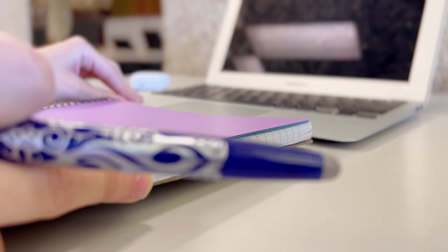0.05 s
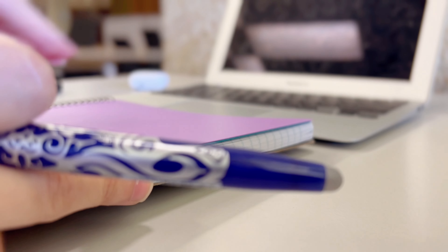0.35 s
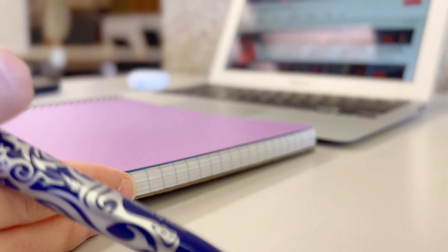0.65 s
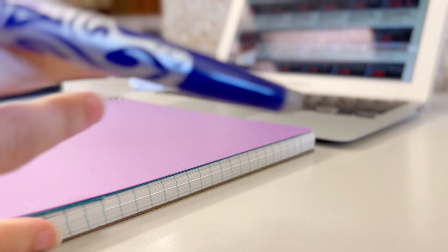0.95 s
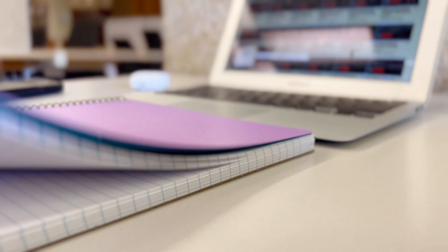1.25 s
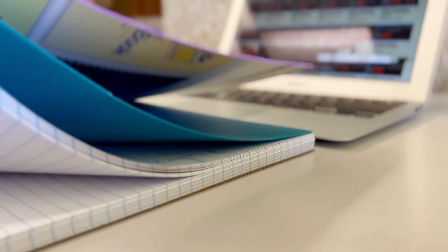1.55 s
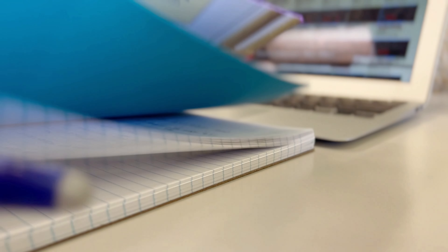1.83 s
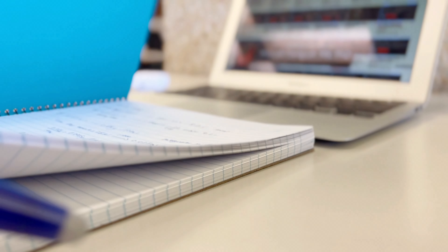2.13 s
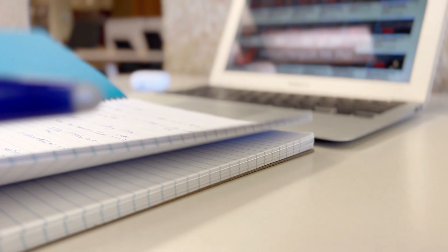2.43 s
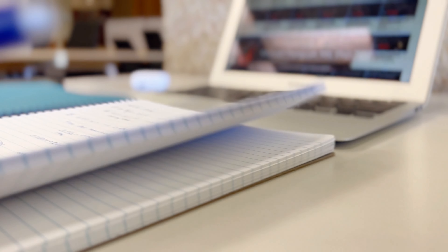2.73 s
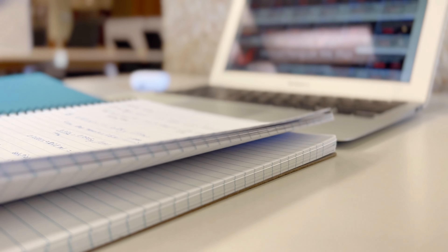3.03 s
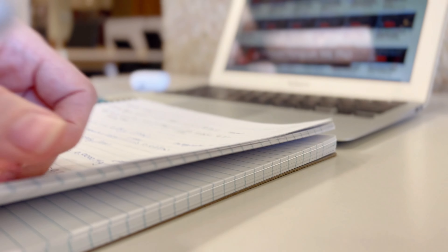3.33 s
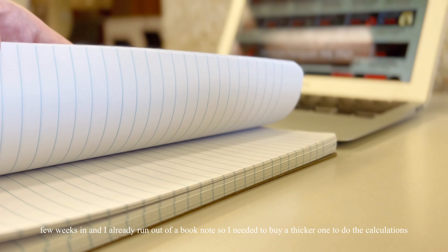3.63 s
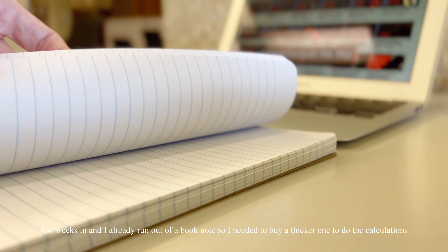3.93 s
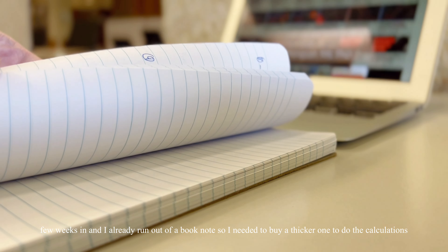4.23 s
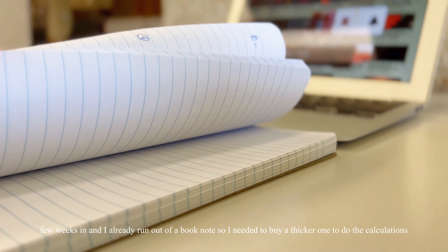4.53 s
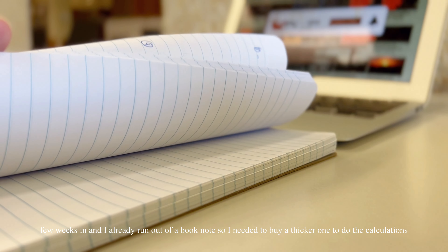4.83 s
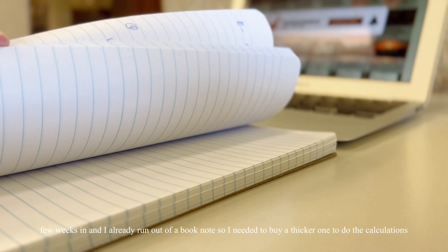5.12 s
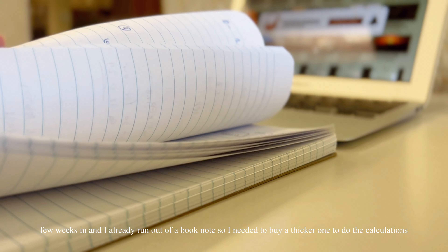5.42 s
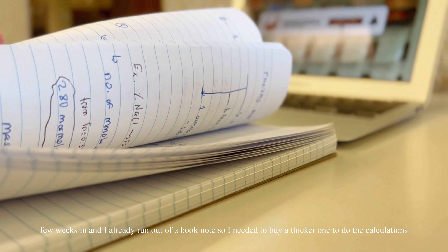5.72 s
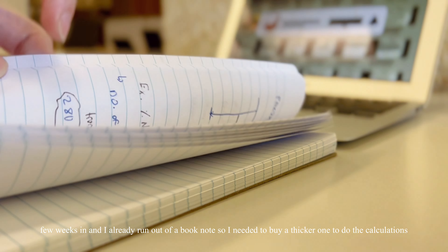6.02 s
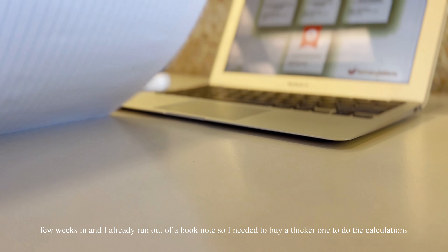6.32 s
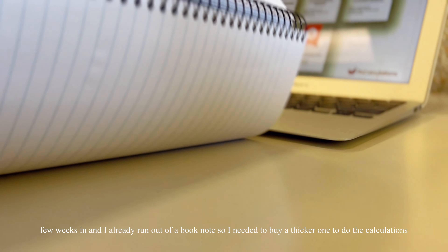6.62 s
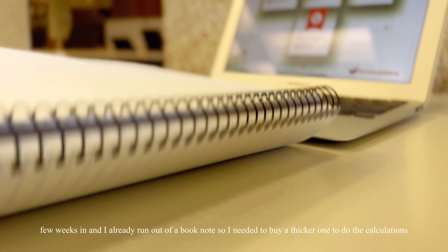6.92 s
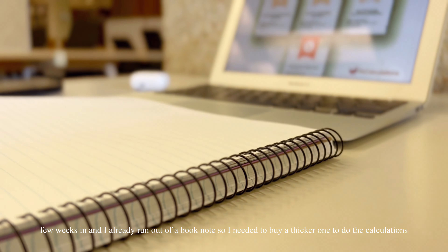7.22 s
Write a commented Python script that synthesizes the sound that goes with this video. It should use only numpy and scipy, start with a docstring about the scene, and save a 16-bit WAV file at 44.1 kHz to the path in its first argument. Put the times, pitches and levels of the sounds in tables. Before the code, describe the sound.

A spiral notebook is opened, leafed through and flipped over with a sharp cover snap, over a low ventilation hum.

```python
"""A desk in a quiet room: a spiral notebook is opened, leafed through and turned over near a phone.
Slipping fibres make sheets hiss and flick; strained patches pop; skin rubs on paper.
The card cover catches, then snaps over, ringing its modes. Contacts tick the wire coil.
Hand and pad thump the desk, and air rushes from under the pad. Ventilation rumbles and hums."""
import sys
import numpy as np
from scipy import signal
from scipy.fft import rfft, irfft, next_fast_len
from scipy.io import wavfile
from scipy.ndimage import uniform_filter1d

SR = 44100
rng = np.random.default_rng(int(sys.argv[2]) if len(sys.argv) > 2 else 0)


def transcribe(u):
    """Save the signal u as a 16-bit wav file named by the first command-line argument.

    u: samples, shape (n,) or (channels, n), limited to [-1, 1]; the rate is SR.
    q: integer samples, one column per channel.
    """
    v = np.clip(np.atleast_2d(u).T, -1, 1)
    q = np.round(v * 32767).astype(np.int16)
    wavfile.write(sys.argv[1], SR, q)


N = 421155

# ventilation rumble: (frequency [Hz], gain [dB])
RUMBLE_SPECTRUM = [(20, -34), (31, -22), (42, 0.5), (55, 2.5), (80, 1.5), (120, -4), (165, -12), (240, -16),
                   (310, -13.5), (450, -23), (700, -30), (1500, -44), (3500, -60.5), (7000, -65),
                   (10000, -64), (13000, -75.5), (16000, -85)]
# chance swells and dips of a low 97 Hz hum: (time [s], relative level [dB])
LOW_HUM_SWELLS = [(0.1, -41.5), (0.81, -36.5), (1.2, -53), (2.52, -37.5), (2.68, -48), (3.86, -31),
                  (3.94, -43), (6.52, -40.5), (6.97, -35.5), (7.34, -55.5), (7.44, -36.5), (8.6, -48),
                  (9.26, -37.5), (9.55, -40.5)]
# fan and mains hums: (frequency [Hz], level [dB], unsteady share [0-1])
HUMS = [(29, -66.5, .3), (116.2, -49, 0.78), (178.2, -65, 0.3), (338.2, -52, 0.44)]

# paper sliding on paper and skin: (time [s], length [s], friction [dB], body re friction [dB],
# crispness re friction [dB], fastest moment [0-1 of length])
SLIDES = [ (0.349, 0.084, -54.5, 2.5, -5, 0.1), (0.409, 0.032, -48.5, -1, -6.5, 0.7),
          (0.443, 0.035, -50.5, -3, -4, 0.4), (0.469, 0.054, -51, -9, -7, 0.35),
          (0.647, 0.057, -57, 7, -10, 0.4), (0.875, 0.055, -54.5, 6, -3.5, 0.54),
          (1.07, 0.097, -67.5, 12, -13, .6), (1.129, 0.041, -58, 6, -14, .55),
          (1.313, 0.17, -47, -1.5, -27, 0.51), (1.408, 0.092, -46.5, 3.5, -24, 0.57),
          (1.502, 0.096, -59.5, 10.5, -15, 0.06), (1.701, 0.059, -51, 6.5, -21, 0.95),
          (1.807, 0.049, -44.5, 6, -2.5, 0.4), (1.839, 0.026, -37.5, -5, -12, 0.4),
          (1.873, 0.13, -63, 14.5, -30, 0), (1.935, 0.15, -55.5, 8, -9, 0.25),
          (2.124, 0.13, -59, 3.5, -11.5, 0.44), (2.228, 0.24, -60, -8, -17, 0.47),
          (2.488, 0.071, -49.5, 3, -5.5, 0.6), (2.533, 0.27, -55.5, 5.5, -11.5, 0.63),
          (2.732, 0.15, -56.5, 6, -9, 0), (2.872, 0.37, -69, -5, -38, 1), (3.254, 0.14, -65, -11, -5, 0.04),
          (3.423, 0.19, -58, 2, -12, 0), (3.781, 0.26, -63.5, 7, -10.5, 0.1),
          (3.88, 0.091, -50.5, -1, -4.5, 0.73), (4.009, 0.11, -51.5, 3, -5, 0.33),
          (4.126, 0.07, -61.5, 9, -15, 0.56), (4.258, 0.079, -66, 7.5, -24, 0.5),
          (4.319, 0.093, -56, 7.5, -18, 0.45), (4.422, 0.24, -71, 11, -16, 0.4),
          (4.669, 0.085, -63.5, 7, -15, 0.1), (4.773, 0.075, -60, 7, -15, 0.43),
          (4.819, 0.14, -61.5, 10.5, -15.5, 0.2), (4.946, 0.062, -60.5, 9.5, -20, 0.46),
          (5.006, 0.11, -57, 8, -13, 1), (5.098, 0.06, -56.5, 11, -12, 0.7),
          (5.234, 0.1, -47, -10, -8, 0.6), (5.298, 0.088, -47.5, -19, -7.5, 0.4),
          (5.463, 0.11, -53.5, -9, -14, 0.77), (5.553, 0.1, -53, -13, -16, 0.3),
          (5.73, 0.16, -58, 1, -18, 0.54), (5.858, 0.16, -49.5, 6.5, -2.5, 0.2),
          (5.94, 0.14, -53, 3.5, -3, 0.6), (6.051, 0.24, -54.5, 1.5, 1, 0.8),
          (6.208, 0.035, -40.5, 6, 1, 0.75), (6.256, 0.24, -54.5, 2.5, 4, 0.41),
          (6.4, 0.27, -52.5, 9.5, -2.5, 0.85), (6.581, 0.3, -46, 9.5, -10, 0.4),
          (6.852, 0.11, -45, 0.5, -9, 0.9), (6.915, 0.12, -47.5, -7, -6, 0),
          (6.992, 0.19, -65, 6, -10, 0.3), (7.188, 0.11, -67, 12, -6, 0.44),
          (7.304, 0.15, -63, 0, -6, 0.48), (7.42, 0.25, -62, 2, -8.5, 0.23), (7.903, 0.2, -71, 4, -5, 0.54)]
# sheet edges, fingertips: (time [s], friction [dB], body re friction [dB], crispness re friction [dB])
SHEET_FLICKS = [(.111, -56, 5, -18), (.115, -46, 3, -8), (.392, -53.5, -12, 1.5), (.699, -58, -1, 3),
                (.916, -55.5, 12.5, -2), (1.340, -64, 15, -27), (1.755, -65, 10, 12),
                (1.8495, -42, -3, -16), (1.8562, -43, -6, -13), (1.881, -51.5, 8, -25),
                (2.197, -56, -6, -7), (2.224, -68, -4, 5), (2.435, -62, -4, -7), (2.475, -74, -4, 0),
                (2.487, -67, -4, 1), (2.510, -42.5, -2, -10.5), (2.516, -54.5, 16, -5),
                (2.527, -46.5, 10.5, -8), (2.538, -61, 9, -11), (2.763, -55.5, -2, -3),
                (2.796, -51, -7, -10), (2.82, -49, 4, -27), (2.986, -62, -10, -19), (3.047, -68, -2, -25),
                (3.183, -75, -4, -3), (3.205, -66, -3, -4), (3.432, -67, -4, -4), (3.511, -59, -2, -34),
                (4.416, -63, 9, -26), (4.427, -69, 7, -24), (4.446, -63, 2, -20), (4.454, -62, 4, -21),
                (4.480, -57, 11, -16), (4.488, -61.5, 10, -16), (4.695, -60.5, 4, -15),
                (4.785, -63, 6, -13), (4.955, -70, 5, -20), (5.061, -52.5, 12, -23), (5.073, -55.5, 3, -4),
                (5.2486, -45.5, 1.5, -4.5), (5.277, -44.5, -2, -6), (5.438, -57, 8, -2.5),
                (5.484, -55.5, 8, -6), (5.544, -63, -8, 1), (5.825, -55, 9, -10), (5.887, -47, 2, -28),
                (5.933, -52, 12, -26), (6.258, -55.5, -6, 14.5), (6.660, -50.5, 12.5, -21),
                (6.754, -51, 12, 3), (6.811, -49, 14, -18), (6.9211, -33.5, -7, -16), (6.963, -42, 1, -24),
                (7.097, -65, 0, -3), (7.015, -55, 1, -23), (7.207, -65, 6, -22), (7.625, -62.5, -7, -0.5),
                (7.655, -67.5, 0, -22), (7.774, -67, 9, -28), (8.088, -69, 7, -13)]
# sheet body: (frequency [Hz], gain [dB])
BODY_SPECTRUM = [(250, -16.5), (480, -7), (700, 4), (920, 0.5), (1200, -0.5), (1550, -10), (2000, -38)]
# paper friction: (frequency [Hz], gain [dB])
FRICTION_SPECTRUM = [(1300, -30.5), (1650, -2.5), (2150, 5), (2700, -4), (3300, -2.5), (4200, -2),
                     (5600, -6), (7000, -11.5), (8200, -16.5), (10000, -27.5), (13000, -30)]
# edge hiss: (frequency [Hz], gain [dB])
EDGE_SPECTRUM = [(5000, -11.5), (7000, -9.5), (8300, -3.5), (9500, -7), (12000, -6), (15500, -15),
                 (17000, -24.5)]

# coil plucked or set down: (time [s], force [dB])
COIL_TICKS = [(0.117, -35.5), (6.7383, -21), (6.9226, -36)]
# wire coil, damped by the sheets: (frequency [Hz], gain [dB], t60 [s])
COIL_MODES = [(2850, 1.5, 0.013), (3800, -3, 0.009), (4530, -4, 0.008), (5700, -10, 0.005),
              (7810, -9, 0.0043), (11090, -7, .005)]
# pad and hand on the desk: (time [s], level [dB], pitch [Hz], decay [s], scuff share [0-1])
DESK_THUMPS = [(0.391, -32.5, 700, 0.0011, 0.04), (0.672, -31.5, 278, 0.0039, 0.6),
               (.6735, -36, 1114, 0.0043, 0.3), (.9155, -42.5, 2220, 0.002, 0.45),
               (.9185, -37, 535, 0.0045, 0.6), (1.8225, -29.5, 534, .003, 0.5),
               (1.8548, -16, 380, 0.002, 0.12), (1.866, -21, 150, 0.005, 0),
               (1.973, -41, 1060, 0.0074, 0.7), (2.511, -37, 415, 0.0046, 0.7),
               (2.522, -34, 286, 0.034, 0.17), (4.445, -40, 990, 0.0036, 0.9), (4.480, -45, 850, .003, .3),
               (4.492, -42, 840, 0.0036, 0.4), (4.59, -45.5, 1080, 0.0031, 0.8),
               (4.934, -45, 1030, 0.0033, 1), (5.076, -40, 855, 0.0054, 0.25),
               (5.2485, -34, 480, 0.0015, 0.5), (5.486, -41, 480, 0.0079, 0.4),
               (5.9189, -26, 480, 0.0026, 0.45), (5.931, -31.5, 260, 0.0032, 0.6),
               (6.227, -32.5, 800, 0.0049, 0.3), (6.247, -37, 1034, 0.014, 0),
               (6.259, -29, 482, 0.002, 0.6), (6.268, -33, 305, 0.032, 0.86),
               (6.272, -44, 900, 0.0072, 0.1), (6.288, -35, 810, 0.0062, 0.6),
               (6.297, -35, 1050, 0.0054, 0.05)]
# resting hands: (start [s], end [s], level [dB])
SKIN_RUBS = [(.7, 3.7, -66.5), (3.42, 4.1, -79.5), (7.0, 8.1, -70.5)]
# skin on paper: (frequency [Hz], gain [dB])
SKIN_SPECTRUM = [(500, -4.5), (1000, 10), (1500, 1), (2200, 2.5), (3200, -5.5), (4500, -6.5), (6500, -5),
                 (8500, -14.5), (11000, -14), (16000, -23)]
# strained sheets: (start [s], end [s], pop rate [1/s], level [dB], centre pitch [Hz])
CRINKLE_SPANS = [(1.13, 1.17, 115, -45, 2360), (1.35, 1.49, 136, -50, 2100), (2.721, 2.83, 110, -48, 2800),
                 (4.032, 4.1, 160, -45, 3400), (5.255, 5.37, 300, -43, 4400), (5.88, 6.04, 84, -39.5, 2630),
                 (6.15, 6.5, 89, -42.5, 5200), (6.5, 6.84, 60, -41.5, 3000), (6.92, 6.99, 170, -31, 3280)]
# skin and paper squeaks: (time [s], length [s], level [dB], centre [Hz], resonator Q [-])
SQUEAKY_SWISHES = [(1.346, 0.11, -47.5, 900, 4.1), (3.447, 0.17, -65, 2160, 3.42),
                   (3.573, 0.054, -69, 5750, 5), (3.646, .07, -70, 3380, 7), (3.735, 0.12, -70, 5570, 8.1),
                   (4.595, 0.088, -70.5, 5700, 4.4), (5.24, 0.17, -52, 3700, 1.4),
                   (7.696, 0.18, -74, 6000, 3), (7.8, .33, -72, 6500, 3), (8.353, .12, -83.5, 4950, 10),
                   (8.479, .14, -86, 4900, 8), (8.659, .12, -80, 5700, 3), (9.201, .06, -83.5, 5300, 3),
                   (9.368, 0.07, -73, 5400, 4)]
# cover edge catching: (time [s], force [dB])
COVER_CATCHES = [(1.822, -18.5)]
# bent cover edge: (frequency [Hz], gain [dB], t60 [s])
CATCH_MODES = [(900, -0.5, 0.006), (1130, 0, 0.018), (2060, 4.5, 0.0054), (2690, 2.5, 0.003),
               (4440, -3, 0.0013), (7540, -10.5, 0.0047), (9300, -8, .003), (11400, -12, 0.0041)]
# pages springing free: (time [s], level [dB], pitch [Hz])
PAGE_BUCKLES = [(2.799, -37, 2500), (2.8197, -42, 3500), (3.2535, -42, 3300), (3.2697, -41, 3020),
                (4.454, -43, 2600), (5.1909, -31.5, 5000), (5.2232, -28, 3960), (5.2385, -31, 4820),
                (5.2491, -34, 2700), (5.2765, -30, 3700), (5.885, -27.5, 2130), (5.9197, -22.5, 2100),
                (6.2305, -36, 3620), (6.237, -32, 3200), (6.258, -27, 5640)]
# cover snapping over: (time [s], force [dB], contact cut-off [Hz], chatter decay [s], chatter [dB])
COVER_SNAPS = [(5.9192, -21, 1100, 0.0022, -3), (6.7212, -0.5, 1970, 0.0017, -19),
               (6.7376, -11.5, 8000, 0.0011, 2), (6.746, -20, 3500, .003, 4.5)]
# card cover: (frequency [Hz], gain [dB], t60 [s])
COVER_MODES = [(760, -5, 0.012), (900, -5, 0.014), (1144, 3, 0.0065), (1420, 2, 0.0052), (2100, -4, 0.0061),
               (2600, -15.5, 0.011), (3230, -8, 0.0051), (4090, -9.5, 0.006), (5700, -8, 0.0034),
               (8000, -10, 0.0037), (11800, -9, 0.0049)]
# air under the turning pad: (time [s], level [dB], resonance [Hz])
AIR_POCKET = [(6.24, -68.5, 900), (6.27, -47, 822), (6.33, -61, 780), (6.42, -49.5, 760), (6.5, -54, 620),
              (6.62, -49.5, 724), (6.72, -43.5, 740), (6.8, -46, 700), (6.87, -58, 800), (6.95, -45, 833),
              (7.02, -59, 793)]
# microphone port dips: (frequency [Hz], Q [-])
PORT_NOTCHES = [(10300, 3.32), (13800, 22)]

BODY, RASP, SHEEN, EDGE = range(4)  # voices of the paper
TIME_S = np.arange(N) / SR


def undb(db):
    """Decibels to gain."""
    return 10 ** (np.asarray(db) / 20)


def unit(x):
    """Scale to rms 1."""
    return x / np.sqrt(np.mean(x ** 2))


def curve(table, column):
    """Table column, linearly interpolated in time."""
    rows = np.array(table)
    return np.interp(TIME_S, rows[:, 0], rows[:, column])


def add(track, at_s, sound):
    """Mix a sound into a track."""
    start = int(at_s * SR)
    track[start:start + len(sound)] += sound[:N - start]


def lowpass(x, hz, order=2):
    """Causal low-pass."""
    return signal.sosfilt(signal.butter(order, min(hz, SR * .45), fs=SR, output="sos"), x)


def below(x, hz, order=8):
    """Zero-phase low-pass."""
    size = next_fast_len(N)
    bins_hz = np.fft.rfftfreq(size, 1 / SR)
    return irfft(rfft(x, size) / (1 + (bins_hz / hz) ** order), size)[:N]


def delay(x, lag_s):
    """Fractional-sample delay."""
    size = next_fast_len(N + 1024)
    bins_hz = np.fft.rfftfreq(size, 1 / SR)
    return irfft(rfft(x, size) * np.exp(-2j * np.pi * bins_hz * lag_s), size)[:N]


def colour(x, spectrum, size=1024):
    """Minimum-phase, unit-power filter through (frequency [Hz], gain [dB]) points."""
    hz, db = np.transpose(spectrum)
    bins_hz = np.fft.rfftfreq(size, 1 / SR)
    gain = undb(np.interp(np.log(bins_hz + 1), np.log(hz), db))
    cepstrum = irfft(np.log(unit(gain)))
    cepstrum[1:size // 2] *= 2
    cepstrum[size // 2 + 1:] = 0
    return signal.oaconvolve(x, irfft(np.exp(rfft(cepstrum))))[:N]


def walk(per_s, count=4096):
    """Smooth random drift, rms 1."""
    steps = np.interp(TIME_S * per_s, np.arange(count), rng.standard_normal(count))
    return unit(uniform_filter1d(steps, int(SR / per_s)))


def ring(force, modes, size=4096):
    """Drive damped modes; neighbours move in opposite directions."""
    t = TIME_S[:size]
    response = sum((-1) ** k * undb(db - 60 * t / t60_s) * np.sin(2 * np.pi * hz * t)
                   for k, (hz, db, t60_s) in enumerate(modes))
    return signal.oaconvolve(force, response)[:N]


def hum(hz, unsteady, per_s):
    """Tone wavering in level and phase, rms 1."""
    waver = np.sqrt(1 - unsteady) + np.sqrt(unsteady / 2) * (walk(per_s) + 1j * walk(per_s))
    return unit(np.real(waver * np.exp(2j * np.pi * hz * TIME_S)))


def ventilation(rumble_db=-39.5, lean_db=0.3):
    """Air rumble and hums, a low one swelling and dipping; bass alike at both ports, hiss less so."""
    rumble, side = (undb(rumble_db) * colour(rng.standard_normal(N), RUMBLE_SPECTRUM, size=16384)
                    for _ in range(2))
    low_hum = undb(curve(LOW_HUM_SWELLS, column=1) + 0.6) * hum(hz=97.2, unsteady=0.37, per_s=12)
    hums = sum(undb(db) * hum(hz, unsteady, per_s=14) for hz, db, unsteady in HUMS)
    mid = rumble + low_hum + hums
    side = undb(-17.0) * side + undb(-2.5) * (side - below(side, hz=350, order=2))
    return np.array([mid * undb(lean_db) + side, mid * undb(-lean_db) - side])


def voice_gains(db, body_db, crisp_db):
    """Gains of body, rasp, sheen and edge; crisp, thin sheets rub higher than stiff card."""
    tilt = undb(2.2 + 0.5 * crisp_db)
    rasp = 1 / np.sqrt(0.56 + 0.56 * tilt ** 2)
    return undb(db) * np.array([undb(body_db), rasp, rasp * tilt, undb(crisp_db)])


def flick(noise, crack_s, flutter_db, flutter_s=0.0085):
    """Sharp release, then the sheet's short flutter; rms 1 over the first 10 ms."""
    t = TIME_S[:len(noise)]
    burst = noise * (np.exp(-t / crack_s) + undb(flutter_db) * np.exp(-t / flutter_s))
    return burst / np.sqrt(np.mean(burst[:SR // 100] ** 2))


def sliding(attack_s=0.029, release_s=0.016, arch_db=14, settle_s=0.016, settle_db=-13):
    """Envelopes of the four voices: each stroke speeds up, slows and stops; the sheets settle."""
    power = np.zeros((4, N))
    for at_s, length_s, db, body_db, crisp_db, fastest in SLIDES:
        age_s = TIME_S[:int(length_s * SR)]
        off_peak = np.interp(age_s / length_s, [0, np.clip(fastest, .05, .95), 1], [-1, 0, 1])
        gate = np.clip(np.minimum(age_s / attack_s, (length_s - age_s) / release_s), 0, 1)
        swell = np.sin(gate * np.pi / 2) ** 2 * undb(-arch_db * off_peak ** 2)
        for track, gain in zip(power, voice_gains(db, body_db, crisp_db)):
            add(track, at_s, (gain * swell) ** 2)
    pole = np.exp(-1 / (settle_s * SR))
    settling = signal.lfilter([1 - pole], [1, -pole], power + 1e-18)
    return np.sqrt(power + undb(settle_db) ** 2 * settling)


def creasing(per_s=210, level_db=-13, spread_db=5, decay_s=0.000494):
    """Gain that roughens a slide: creases give way in brief bursts."""
    sizes = (rng.random(N) < per_s / SR) * undb(spread_db * rng.uniform(-1, 1, N))
    pole = np.exp(-1 / (decay_s * SR))
    bursts = signal.lfilter([1], [1, -pole], sizes ** 2 + 1e-18)
    return np.sqrt(1 + undb(level_db) ** 2 * bursts / bursts.mean())


def fibres(slips_per_s, spread_db):
    """Tiny fibre slips: impulses of random time and size, rms 1."""
    sizes = undb(spread_db * np.minimum(rng.exponential(size=N), 5))
    return unit((rng.random(N) < slips_per_s / SR) * sizes * rng.standard_normal(N))


def paper_force(drive, voice, slide_db, flick_db, crack_s, flutter_db, slips_per_s, spread_db):
    """Force of fibre slips and flicks on one voice."""
    force = drive[voice] * undb(slide_db) * fibres(slips_per_s, spread_db)
    for (at_s, *touch), noise in zip(SHEET_FLICKS, rng.standard_normal((128, 4096))):
        gain = undb(flick_db) * voice_gains(*touch)[voice]
        add(force, at_s, gain * flick(noise, crack_s, flutter_db))
    return force


def flexing(x, spectrum, bend, shift_oct=0.11):
    """Bending shifts a sheet's resonances: crossfade of slack (-1), resting (0) and taut (1)."""
    out = np.zeros(N)
    for state in (-1, 0, 1):
        shifted = [(hz * 2 ** (state * shift_oct), db) for hz, db in spectrum]
        out += np.maximum(1 - np.abs(bend - state), 0) * colour(x, shifted)
    return out


def curling(x, lag_s=0.000662, sway=0.23, echo_gain=0.16):
    """A curling sheet reflects the sound over a changing path."""
    lag_samples = SR * lag_s * np.exp(sway * walk(per_s=2.7))
    echo = np.interp(np.arange(N) - lag_samples, np.arange(N), x)
    return (x + echo_gain * echo) / np.hypot(1, echo_gain)


def paper():
    """Sheets flick and slide; an uneven push and a catching grip move all four voices together."""
    grip = undb(1.1 * walk(per_s=28) + 1.2 * walk(per_s=160))
    drive = sliding() * grip * creasing()
    bend = np.tanh(walk(per_s=3.6))
    body = paper_force(drive, BODY, slide_db=-4.5, flick_db=-4.0, crack_s=0.0017,
                       flutter_db=-15.5, slips_per_s=2500, spread_db=2.0)
    rasp = paper_force(drive, RASP, slide_db=-1.0, flick_db=-1.0, crack_s=0.0023,
                       flutter_db=-18.0, slips_per_s=6500, spread_db=2.0)
    sheen = paper_force(drive, SHEEN, slide_db=-1.5, flick_db=0.0, crack_s=0.0033,
                        flutter_db=-18.5, slips_per_s=9000, spread_db=-0.5)
    edge = paper_force(drive, EDGE, slide_db=3.0, flick_db=3.0, crack_s=0.0009,
                       flutter_db=-17.5, slips_per_s=11000, spread_db=-1.5)
    friction = below(rasp, hz=3400) + sheen - below(sheen, hz=3000)
    sheet = flexing(body, BODY_SPECTRUM, bend) + flexing(friction, FRICTION_SPECTRUM, bend)
    return curling(sheet) + colour(edge, EDGE_SPECTRUM)


def binding():
    """Sharp contacts ring the wire coil."""
    force = np.zeros(N)
    for at_s, db in COIL_TICKS:
        force[int(at_s * SR)] = undb(db)
    return ring(force, COIL_MODES)


def thumps(sag=0.193, sag_s=0.0028, attack_s=0.00097, size=8192):
    """Dull blows; pitch sags as the pad settles on its air cushion. Glancing blows scuff."""
    t, out = TIME_S[:size], np.zeros(N)
    for at_s, db, hz, decay_s, scuff in DESK_THUMPS:
        pitch_hz = hz * (1 - sag * (1 - np.exp(-t / sag_s)))
        boom = np.sin(2 * np.pi * np.cumsum(pitch_hz) / SR)
        band = signal.butter(2, [hz * .62, hz * 1.15], "bandpass", fs=SR, output="sos")
        rub = unit(signal.sosfilt(band, rng.standard_normal(2 * size))[size:])
        blow = np.sqrt(1 - scuff) * boom + np.sqrt(scuff / 2) * rub
        swell = (1 - np.exp(-t / attack_s)) * np.exp(-t / decay_s)
        add(out, at_s, undb(db) * swell / swell.max() * blow)
    return out


def rubbing(wander_db=1.8):
    """Skin creeps over paper: thin, wandering hiss."""
    gates = sum(undb(db) * ((TIME_S > start_s) & (TIME_S <= end_s)) for start_s, end_s, db in SKIN_RUBS)
    level = uniform_filter1d(gates, size=800) * undb(wander_db * walk(per_s=4.2))
    return colour(level * fibres(slips_per_s=12000, spread_db=0.0), SKIN_SPECTRUM)


def pop(hz, decay_cycles, scuff, size=512):
    """A patch of sheet flips and rings briefly, with some fibre noise."""
    cycles = min(hz, SR * .45) * TIME_S[:size]
    wave = np.sin(2 * np.pi * cycles) + scuff * rng.standard_normal(size)
    return np.exp(-cycles / decay_cycles) * wave


def crinkles(spread_oct=0.5, spread_db=2.5, count=64):
    """Patches of a strained sheet pop at random, each at its own pitch."""
    out = np.zeros(N)
    for start_s, end_s, per_s, db, hz in CRINKLE_SPANS:
        times_s = start_s + np.cumsum(rng.exponential(size=count)) / per_s
        for at_s, (pitch, strength) in zip(times_s, rng.uniform(-1, 1, (count, 2))):
            grain = pop(hz * 2 ** (spread_oct * pitch), decay_cycles=1.6, scuff=0.15)
            if at_s < end_s:
                add(out, at_s, undb(db + spread_db * strength) * grain)
    return out


def swishes():
    """Skin and paper squeak faintly: swells of narrow-band hiss."""
    out = np.zeros(N)
    for at_s, length_s, db, hz, q in SQUEAKY_SWISHES:
        swell = np.hanning(int(length_s * SR))
        peak = signal.iirpeak(hz, q, fs=SR)
        hiss = signal.lfilter(*peak, signal.lfilter(*peak, rng.standard_normal(SR)))
        add(out, at_s, undb(db) * swell * unit(hiss)[:len(swell)])
    return out


def cover_catch(slip_s=0.0011, jitter=0.059, fade_db=2.9, count=6):
    """The card's edge sticks and slips, each slip weaker than the last."""
    force, slips = np.zeros(N), np.arange(count)
    for at_s, db in COVER_CATCHES:
        times_s = at_s + slip_s * (slips + jitter * rng.standard_normal(count))
        force[(times_s * SR).astype(int)] += undb(db - fade_db * slips)
    return ring(force, CATCH_MODES)


def buckles():
    """A bent page springs free with a dry crack."""
    out = np.zeros(N)
    for at_s, db, hz in PAGE_BUCKLES:
        add(out, at_s, undb(db) * pop(hz, decay_cycles=1.36, scuff=0.31))
    return out


def cover_snaps(low_cut_hz=684, size=4096):
    """One contact plus brief chatter rings the cover; the small card radiates little bass."""
    t, force = TIME_S[:size], np.zeros(N)
    for at_s, db, contact_hz, chatter_s, chatter_db in COVER_SNAPS:
        chatter = rng.standard_normal(size) * np.exp(-t / chatter_s)
        push = undb(chatter_db) * chatter / np.linalg.norm(chatter) + (t == 0)
        add(force, at_s, undb(db) * lowpass(push, contact_hz, order=1))
    low_cut = signal.butter(2, low_cut_hz, "highpass", fs=SR, output="sos")
    return undb(-4.5) * ring(signal.sosfilt(low_cut, force), COVER_MODES)


def air_pocket(width_hz=170):
    """Air squeezed from under the pad rushes hollowly; its resonance follows the gap."""
    rush = lowpass(rng.standard_normal(N) + 1j * rng.standard_normal(N), width_hz / 2)
    resonance_hz = curve(AIR_POCKET, column=2)
    hollow = unit(np.real(rush * np.exp(2j * np.pi * np.cumsum(resonance_hz) / SR)))
    gate = (TIME_S > AIR_POCKET[0][0]) & (TIME_S < AIR_POCKET[-1][0])
    return hollow * undb(curve(AIR_POCKET, column=1)) * gate


def room(x, t60_s=0.097, build_s=0.011, gain_db=-16.5, size=8192):
    """Desk, screen and walls return a short, dull tail, different on each call."""
    t = TIME_S[:size]
    noise = lowpass(rng.standard_normal(size), hz=5500, order=1)
    tail = noise * undb(-60 * t / t60_s) * (1 - np.exp(-t / build_s))
    return undb(gain_db) * signal.oaconvolve(x, tail / np.linalg.norm(tail))[:N]


def ports(x, left_db, right_db, late_db, send_db, lag_s=0.0004, low_hz=400, high_hz=7000):
    """Source on the left: the right port hears it weaker, plus a late path around the case."""
    send = undb(send_db) * x
    left = undb(left_db) * x + room(send)
    right = undb(right_db) * x + undb(late_db) * delay(x, lag_s) + undb(6.0) * room(send)
    centre = x + room(send)
    # panned only between low_hz and high_hz
    offsets = [below(port - centre, high_hz, order=16) for port in (left, right)]
    diffuse_top = undb(5.0) * room(send - below(send, high_hz, order=16))
    return np.array([centre + offset - below(offset, low_hz, order=4) + sign * diffuse_top
                     for offset, sign in zip(offsets, (1, -1))])


def scene():
    """Notebook over ventilation; ticks are drier, and the cover snaps right beside the phone."""
    handling = paper() + crinkles() + rubbing() + thumps() + air_pocket() + swishes()
    handling = ports(handling, left_db=3.5, right_db=-9.0, late_db=-17.0, send_db=0.0)
    ticks = binding() + buckles() + cover_catch()
    ticks = ports(ticks, left_db=3.5, right_db=-8.5, late_db=-11.0, send_db=-3.0)
    snaps = ports(cover_snaps(), left_db=6.0, right_db=-8.0, late_db=-5.5, send_db=-1.0)
    return handling + ticks + snaps + ventilation()


def record(dry):
    """Ends fade, the right channel trails slightly, the ports notch the treble, the top is cut."""
    right_lag_s, top_hz = 0.0000175, 16100
    left, right = dry * signal.windows.tukey(N, .002)
    stereo = np.array([left, delay(right, right_lag_s)])
    for hz, q in PORT_NOTCHES:
        stereo = signal.lfilter(*signal.iirnotch(hz, q, fs=SR), stereo)
    return signal.sosfilt(signal.ellip(8, .2, 70, top_hz, fs=SR, output="sos"), stereo)


dry = scene()
out = record(dry)
transcribe(out)
```